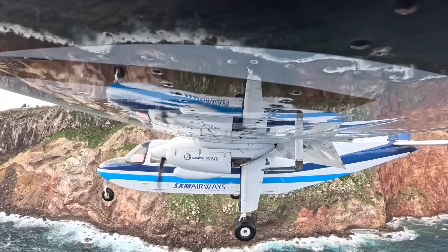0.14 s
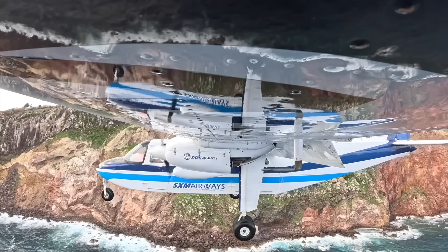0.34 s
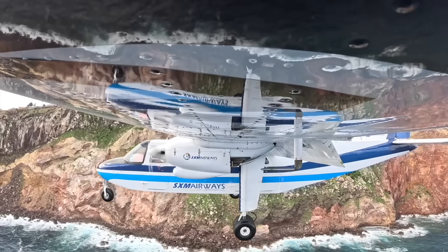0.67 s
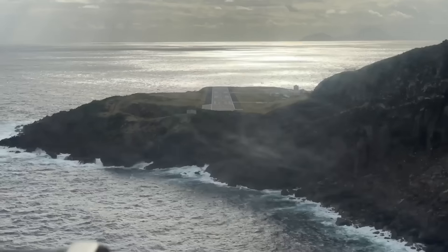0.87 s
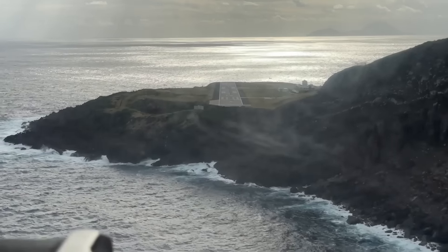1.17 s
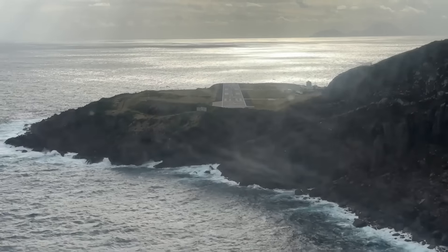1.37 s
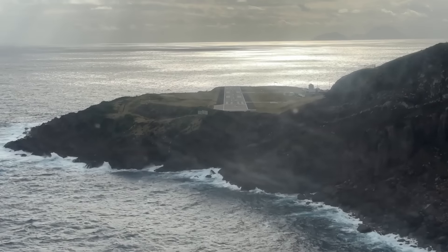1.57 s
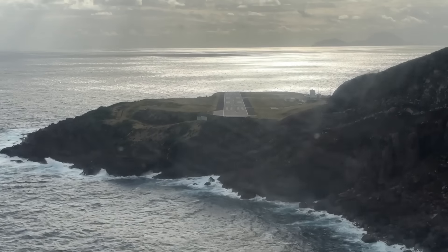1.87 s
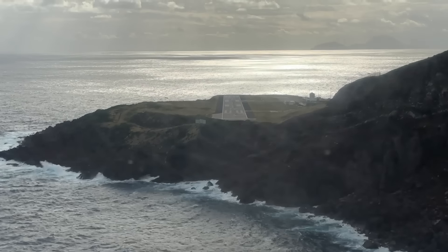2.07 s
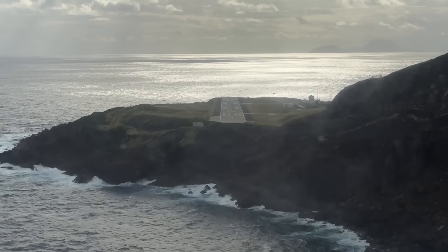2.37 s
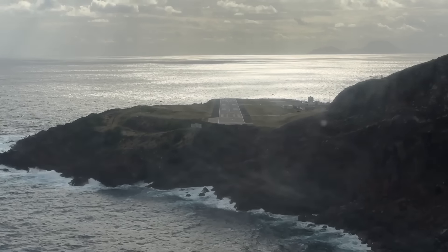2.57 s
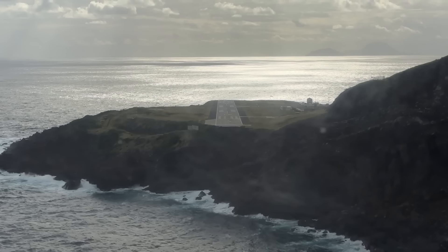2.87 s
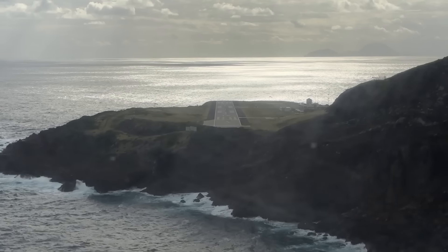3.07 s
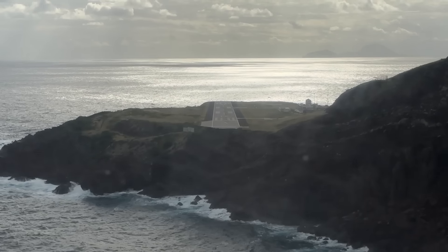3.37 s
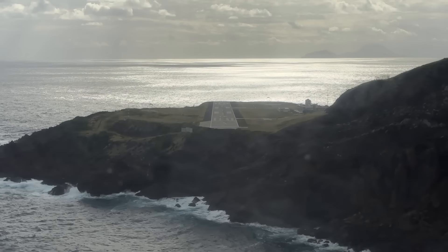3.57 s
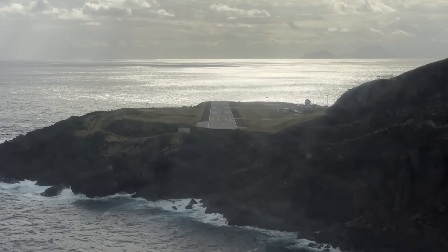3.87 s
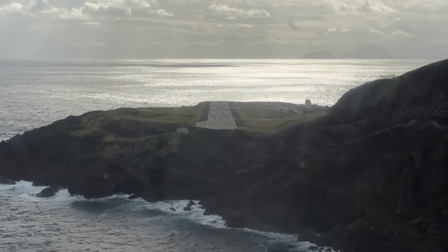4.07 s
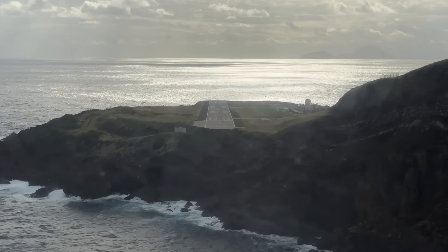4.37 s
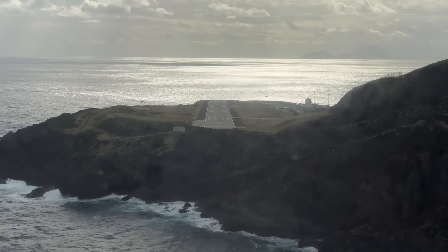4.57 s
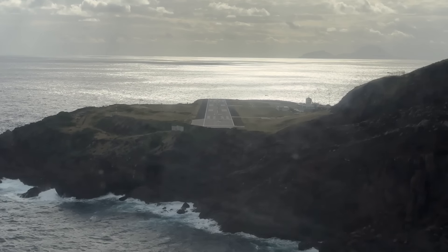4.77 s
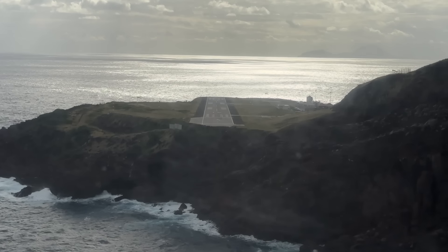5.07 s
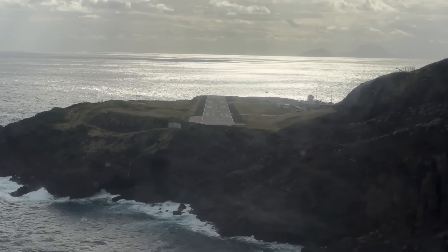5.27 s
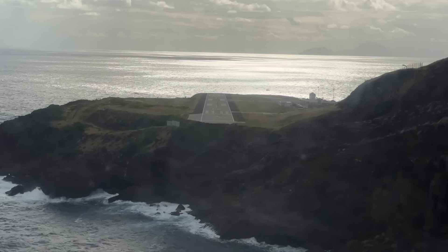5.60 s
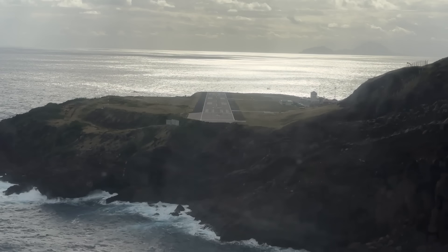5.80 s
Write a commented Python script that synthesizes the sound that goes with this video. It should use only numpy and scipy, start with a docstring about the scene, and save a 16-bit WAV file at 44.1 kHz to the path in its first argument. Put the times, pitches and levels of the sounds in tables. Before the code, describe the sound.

A light twin-propeller plane drones loudly in rushing wind, then is abruptly heard from inside, throbbing with a thin whine and speeding up slightly.

```python
"""A loud exhaust drone in a rushing slipstream, out on the wing of a light twin piston aircraft on final
approach; then, abruptly, its cabin. The two engines turn at slightly different speeds, so their propeller
and firing tones beat against each other. Each drives a whining alternator. Air rushes over the hull and
rings the panels, the trim buzzes, a gap moans in the gusts and the electronics whistle faintly.
Near the end the nearer engine speeds up, and the farther one follows a little."""
import sys
import numpy as np
from scipy import signal
from scipy.fft import rfft, irfft
from scipy.io import wavfile

SR = 44100
rng = np.random.default_rng(int(sys.argv[2]) if len(sys.argv) > 2 else 0)


def generate_wav(signal):
    """Clip the signal to [-1, 1] and save it as 16-bit WAV at the path in sys.argv[1]."""
    frames = np.transpose(np.atleast_2d(signal))
    scaled = np.clip(frames, -1, 1) * 32767
    pcm = np.round(scaled).astype(np.int16)
    wavfile.write(sys.argv[1], SR, pcm)


N = 261954

# electrical whistles: (frequency [Hz], rms level [dB], time at full level [s])
WHISTLES = [(10908, -73, 0), (11442, -73, 0), (10543, -69, 3.0)]
# spectra of the slipstream, the air over the hull and the trim: (frequency [Hz], density [dB re 1/Hz])
SLIPSTREAM_SPECTRUM = [(25, -69), (45, -64), (65, -61), (125, -48), (170, -50.5), (380, -55), (600, -59.5),
                       (1000, -64), (1800, -64), (2800, -69), (3400, -69.5), (4250, -75), (5200, -83.5),
                       (7000, -95.5), (9500, -101), (15000, -103.8)]
HULL_SPECTRUM = [(25, -82), (40, -73), (58, -61), (85, -61), (130, -55.5), (220, -63), (280, -68),
                 (480, -72), (850, -77), (1200, -80.5), (1650, -78.5), (3100, -84), (5500, -90),
                 (8800, -96.5), (15000, -96.5)]
TRIM_SPECTRUM = [(2000, -110), (4500, -96.5), (7000, -94), (9000, -97.5), (10800, -92), (15000, -104.5)]
# modes of panes and panels: (frequency [Hz], bandwidth [Hz], peak density [dB re 1/Hz])
PANEL_MODES = [(615, 33, -70), (720, 93, -73.5), (995, 34, -78.5), (2142, 40, -75), (2258, 62, -77),
               (2514, 300, -80), (3310, 300, -86.5)]
# gusts at the gap: (time [s], peak level [dB re GUST_REFERENCE_DB])
GUSTS = [(1.429, -35.5), (1.709, -40.5), (2.091, -41), (2.639, -40.5), (2.849, -39), (3.199, -37),
         (3.419, -36), (3.979, -38), (4.149, -41), (4.419, -42.5), (5.639, -40), (5.829, -39.5)]
# alternator whine on the wing: (harmonic [number], level [dB re WING_WHINE_DB])
WING_WHINE = [(1, -1), (3, -27), (4, -39)]
# each alternator's whine in the cabin: (harmonic [number], rms level [dB])
FAR_WHINE = [(1, -60.5), (2, -59), (3, -71)]
NEAR_WHINE = [(1, -41), (2, -52.5), (3, -70)]
# throttle pushes of each engine: (time [s], speed gained [rpm])
FAR_PUSHES = [(.777, 122), (5.1, 45)]
NEAR_PUSHES = [(.777, 104), (4.61, 185)]
# crankshaft speed of the near engine on the wing: (time [s], speed [rpm])
WING_SPEED = [(0, 1997), (.3, 2034), (.78, 2052)]
# exhaust tones on the wing: (order [cycles/turn], rms level [dB])
EXHAUST_ORDERS = [(2, -36.5), (3, -24.3), (4.5, -34), (5.5, -37), (6, -30.5), (7, -35.5), (10, -44),
                  (11.5, -42), (12, -42.5), (14.5, -44), (16, -48), (18, -50), (20.5, -50), (34.5, -50)]
# far engine in the cabin: (order [cycles/turn], rms level at reference speed [dB], slope [dB/rpm])
FAR_ORDERS = [(2, -46.5, .09), (3, -43, 0.0046), (4, -39.3, -0.05), (4.5, -58, 0.14), (6, -37.5, -.03),
              (6.5, -59, -0.2), (7, -55.5, 0.08), (8, -60, 0.1), (9, -57.5, -.01), (10, -47.5, .03),
              (12, -54, 0.045)]
# near engine in the cabin; even orders are the two blades, multiples of 3 the six cylinders:
# (order [cycles/turn], level at reference speed [dB], slope below it [dB/rpm], slope above it [dB/rpm])
NEAR_ORDERS = [(2, -31.5, -0.011, -.044), (3, -37.5, -0.038, .078), (3.5, -62, 0, 0),
               (4, -24.5, 0.0066, -0.0037), (4.5, -42, .025, -.006), (5.5, -57, -0.04, 0),
               (6, -27.3, 0.041, -.001), (8, -52, .005, 0.0407), (10, -45, 0.0025, 0.0018),
               (12, -49, 0.076, .03), (12.5, -57, .08, -0.0475), (14, -49.5, 0.081, .018),
               (15, -62, .08, 0), (16, -66, .05, 0)]

CABIN_FROM_S, FADE_FROM_S = .777, 2.66
NEAR_REFERENCE_RPM, FAR_REFERENCE_RPM = 2100, 1970
NEAR_WHINE_PER_TURN, FAR_WHINE_PER_TURN = 76.95, 76.88
WING_WHINE_DB, GUST_REFERENCE_DB = -38.5, -10.5
TIME = np.arange(N) / SR


def from_db(db):
    """Amplitude grows tenfold with every 20 dB."""
    return 10 ** (np.asarray(db) / 20)


def cycles(hz):
    """Phase, in cycles, is the integral of frequency."""
    return np.cumsum(hz) / SR


def drift(rate_hz):
    """Low-pass filtered noise gives a random wander of unit rms."""
    hz = np.arange(N // 2 + 1) * SR / N
    wander = irfft(rfft(rng.standard_normal(N)) / (1 + (hz / rate_hz) ** 2), N)
    return wander / np.sqrt(np.mean(wander ** 2) + 1e-20)


def tone(phase, db):
    """Simple harmonic motion at a given rms level, with phase in cycles."""
    return np.sqrt(2) * from_db(db) * np.cos(2 * np.pi * phase)


def fade_db(db_per_s):
    """A steady level, then exponential decay: a straight line in decibels, shifted to zero mean."""
    db = -db_per_s * np.maximum(TIME - FADE_FROM_S, 0)
    return db - np.mean(db)


def turbulence(spectrum):
    """Turbulence spreads its power over a continuous spectrum: white noise shaped to a given density."""
    hz, db = np.transpose(spectrum)
    bins = np.maximum(np.arange(N // 2 + 1) * SR / N, 1)
    gain = from_db(np.interp(np.log(bins), np.log(hz), db)) * np.sqrt(SR / 2)
    return irfft(rfft(rng.standard_normal(N)) * gain, N)


def resonate(force, hz, width_hz):
    """A damped resonator responds most near its natural frequency, here with unit gain."""
    r = np.exp(-np.pi * width_hz / SR)
    feedback = [1, -2 * r * np.cos(2 * np.pi * hz / SR), r * r]
    return signal.lfilter(np.array([1, 0, -1]) * (1 - r * r) / 2, feedback, force)


def whistles():
    """Steady oscillation in the electronics gives faint pure tones; one enters over a second."""
    return sum(tone(hz * TIME, db) * np.clip(TIME - full_s + 1, 0, 1) for hz, db, full_s in WHISTLES)


def trim_buzz(turns):
    """Forced vibration: the shaft shakes the trim once and twice a turn, modulating its noise."""
    shake_db = 1.3 * np.cos(2 * np.pi * turns) + 2.9 * np.cos(2 * np.pi * 2 * turns)
    return turbulence(TRIM_SPECTRUM) * from_db(fade_db(1.5) + shake_db + 1.7 * drift(220))


def hull_rush():
    """Broadband excitation: air rushing over the hull rings panes and panels at their resonances."""
    panels = sum(resonate(rng.standard_normal(N), hz, width) * from_db(db)
                 for hz, width, db in PANEL_MODES) * np.sqrt(SR / 2)
    return (turbulence(HULL_SPECTRUM) + panels) * from_db(fade_db(.4) + .63 * drift(34))


def gap_moan():
    """Vortex shedding: eddies at a gap sing on an unsteady pitch, louder in each gust."""
    half_width_s, lull_db = .092, -54.5
    gusts = sum(from_db(GUST_REFERENCE_DB + db) * np.exp(-((TIME - s) / half_width_s) ** 2)
                for s, db in GUSTS)
    pitch_hz = 642.6 + 12 * drift(25.7)
    return (from_db(lull_db) + gusts) * tone(cycles(pitch_hz), 3.1 * drift(51))


def slipstream(turns):
    """Amplitude modulation: two propeller blades chop the turbulent flow twice a turn."""
    chop = 1 + .066 * np.cos(2 * np.pi * 2 * turns)
    return turbulence(SLIPSTREAM_SPECTRUM) * chop * from_db(.73 * drift(20))


def alternator(phase, turns, partials, waver_db, flutter, jerk):
    """Phase modulation of a whine, in cycles: the belt flutters, the crankshaft jerks it twice a turn."""
    uneven_phase = phase + flutter * drift(28) + jerk * np.sin(2 * np.pi * 2 * turns)
    return sum(tone(k * uneven_phase, db + waver_db * drift(90)) for k, db in partials)


def shaft_rpm(start_rpm, pushes, lag_s=1.33):
    """First-order lag: after each throttle push the engine nears its new speed exponentially."""
    return start_rpm + sum(gain * (1 - np.exp(-np.maximum(TIME - s, 0) / lag_s)) for s, gain in pushes)


def engine(turns, orders, waver_db, wobble_turns):
    """A four-stroke cycle lasts two turns, giving half orders; uneven firing shakes phase and level."""
    angle = turns + wobble_turns * drift(3)
    dispersion = .03  # the airframe delays higher tones more, which smears each blade pulse
    return sum(tone(k * angle - dispersion * k * k, db + waver_db * drift(1.5)) for k, db in orders)


def far_engine(rpm, turns):
    """The slower, quieter drone and whine; speed moves its orders through the cabin's standing waves."""
    orders = [(k, db + slope * (rpm - FAR_REFERENCE_RPM)) for k, db, slope in FAR_ORDERS]
    drone = engine(turns, orders, waver_db=.6, wobble_turns=.0015)
    whine = alternator(FAR_WHINE_PER_TURN * turns, turns, FAR_WHINE, waver_db=2, flutter=.061, jerk=.03)
    return drone + whine


def near_engine(rpm, turns):
    """The louder drone and whine; the cabin's standing waves rebalance its orders as speed rises."""
    below = np.minimum(rpm - NEAR_REFERENCE_RPM, 0)
    above = np.maximum(rpm - NEAR_REFERENCE_RPM, 0)
    orders = [(k, db + slope_below * below + slope_above * above)
              for k, db, slope_below, slope_above in NEAR_ORDERS]
    drone = engine(turns, orders, waver_db=.2, wobble_turns=.0007)
    whine = alternator(NEAR_WHINE_PER_TURN * turns, turns, NEAR_WHINE,
                       waver_db=1.07, flutter=.015, jerk=.022)
    return (drone + whine) * from_db(fade_db(.45))


def wing():
    """Direct radiation: the open exhaust, the slipstream and an ever more steeply climbing whine."""
    rpm = np.interp(TIME, *np.transpose(WING_SPEED))
    turns = cycles(rpm / 60)
    whine_hz = 2068 + 217 * TIME ** 2
    partials = [(k, WING_WHINE_DB + db) for k, db in WING_WHINE]
    rush = slipstream(turns)
    whine = alternator(cycles(whine_hz), turns, partials, waver_db=.5, flutter=.035, jerk=.018)
    return rush + whine + engine(turns, EXHAUST_ORDERS, waver_db=.9, wobble_turns=.0032)


def cabin():
    """Beating: two engines at unequal speeds throb through the hull, over the noise of air and trim."""
    near_rpm, far_rpm = shaft_rpm(2004, NEAR_PUSHES), shaft_rpm(1857.7, FAR_PUSHES)
    near_turns = cycles(near_rpm / 60) + .0025 * drift(1.5)  # the shaft hunts about its even pace
    far_turns = cycles(far_rpm / 60) - 1.235  # this lag sets when the beats fall
    engines = near_engine(near_rpm, near_turns) + far_engine(far_rpm, far_turns)
    return engines + hull_rush() + trim_buzz(near_turns) + gap_moan()


def scene():
    """Superposition at a listening point that jumps from wing to cabin; the whistles sound in both."""
    inside = np.clip((TIME - CABIN_FROM_S) / .0049 + .5, 0, 1)
    return ((1 - inside) * wing() + inside * cabin() + whistles())[None]


def record(dry):
    """Band limiting: a steep low-pass filter removes the highest treble."""
    return signal.sosfilt(signal.ellip(12, .1, 90, 15750, fs=SR, output="sos"), dry)


dry = scene()
out = record(dry)
generate_wav(out)
```